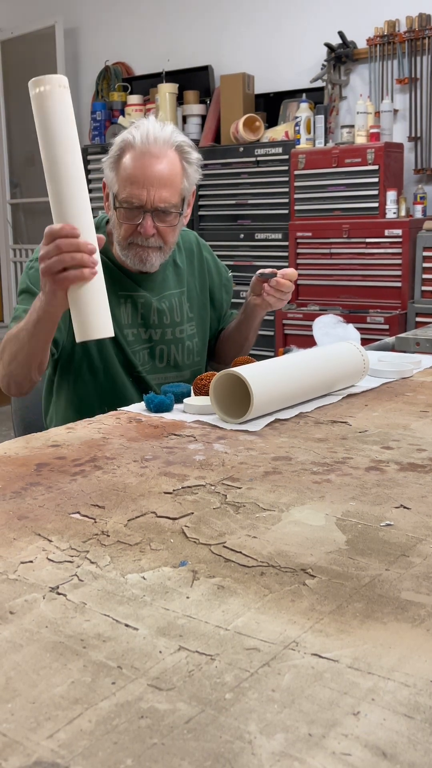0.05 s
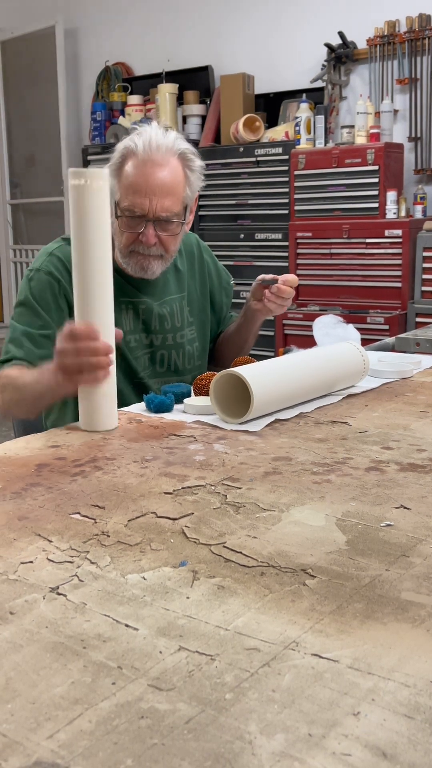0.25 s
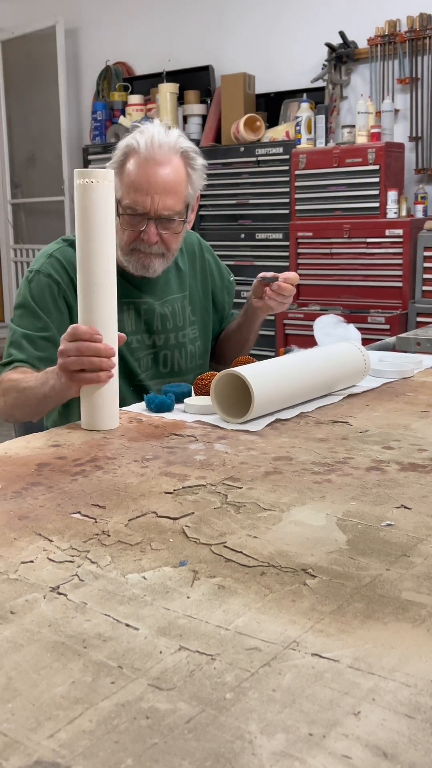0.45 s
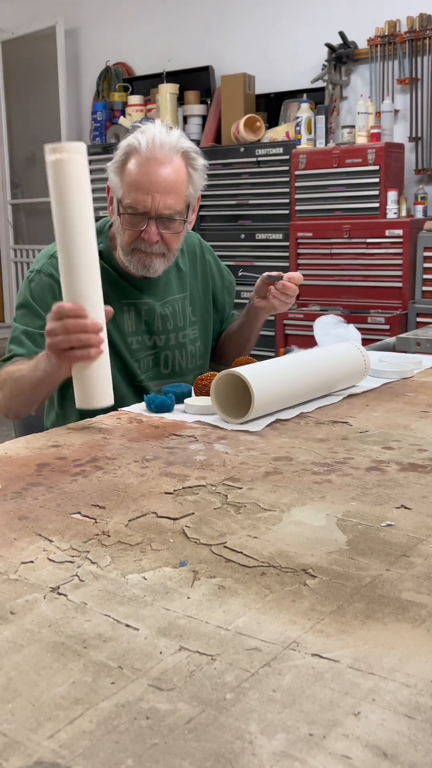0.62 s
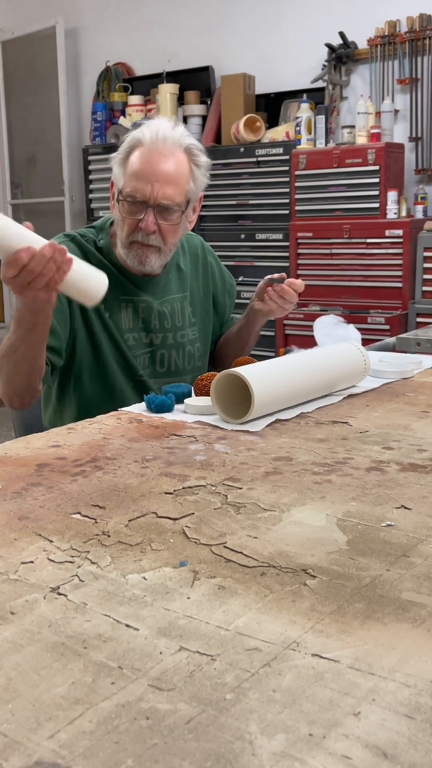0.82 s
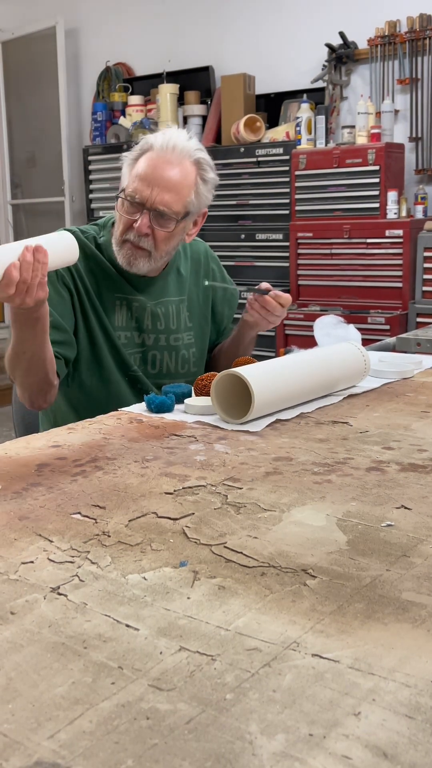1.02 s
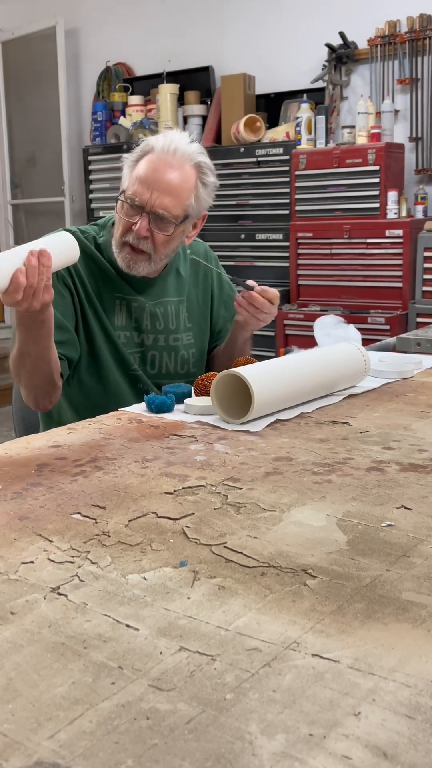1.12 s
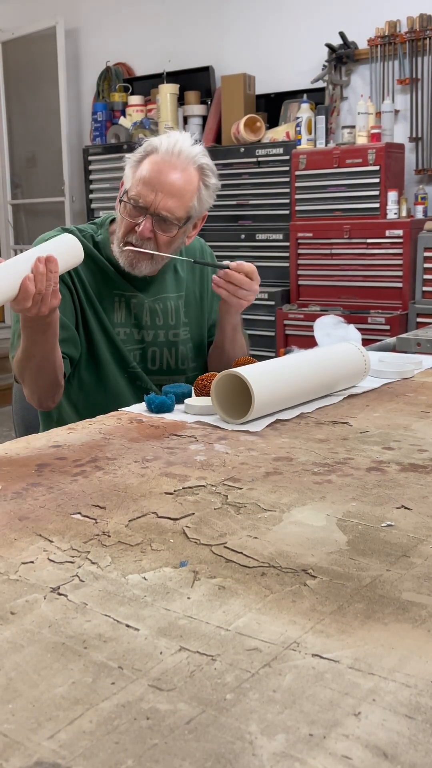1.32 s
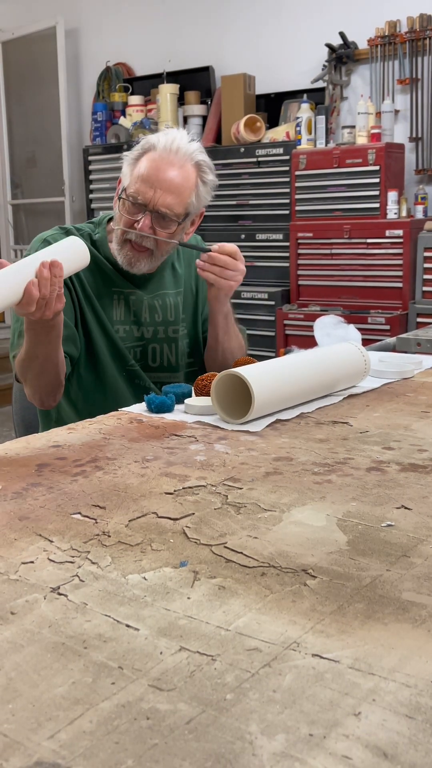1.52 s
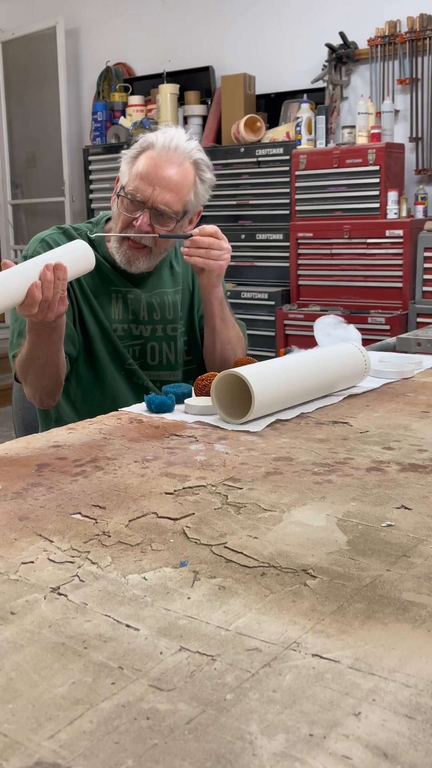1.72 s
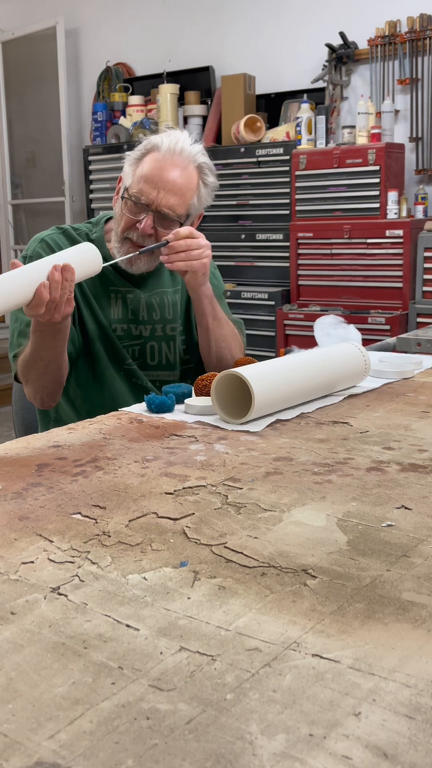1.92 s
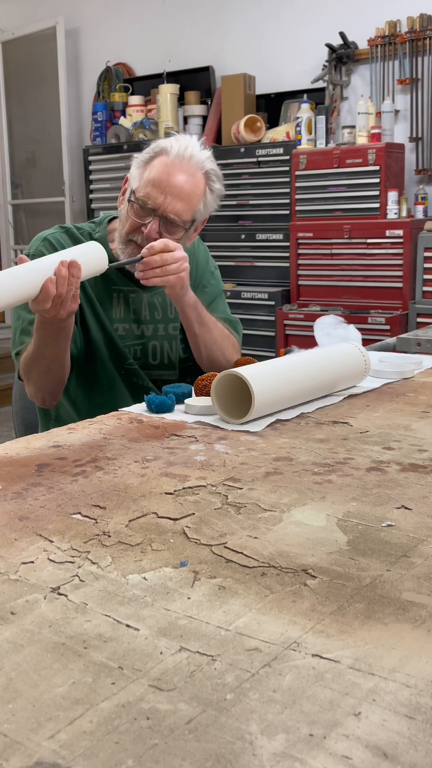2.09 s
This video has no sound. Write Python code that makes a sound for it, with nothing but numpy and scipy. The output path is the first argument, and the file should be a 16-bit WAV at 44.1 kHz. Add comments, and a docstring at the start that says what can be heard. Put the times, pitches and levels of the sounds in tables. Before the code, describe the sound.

Booming knock of a plastic pipe on a wooden bench, followed by light metallic ticks.

```python
"""A live workshop, heard close up from the stereo microphone of a camera standing on a wooden workbench.
An earlier knock is dying away in the room as a plastic pipe is knocked on end on the bench, which booms
and shakes the camera. The limiter ducks under the blow and lets the room swell back.
Lifted off, the open pipe hums faintly, with soft rubs and a tick of handling.
Last, a thin metal rod ticks and taps against its rim."""
import sys
import numpy as np
from scipy import signal
from scipy.fft import rfft, irfft, next_fast_len
from scipy.io import wavfile
from scipy.ndimage import uniform_filter1d, minimum_filter1d, map_coordinates

SR = 44100
rng = np.random.default_rng(int(sys.argv[2]) if len(sys.argv) > 2 else 0)


def wav_out(sig):
    """Save sig, one row per channel (or a flat mono array), as 16-bit PCM at SR to the path in sys.argv[1]."""
    wavfile.write(sys.argv[1], SR, np.round(np.clip(np.atleast_2d(sig).T, -1, 1) * 32767).astype(np.int16))


N = 94815

# Levels are relative within each table; a spectrum's levels are per hertz.
# reverberation of the workshop (frequency [Hz], t60 [s])
ROOM_T60 = [(60, 0.44), (120, 0.61), (300, .8), (600, 0.68), (1500, 0.75), (3000, 0.76), (5500, 0.65),
            (9000, 0.48), (13000, 0.47)]
# left-right likeness at the microphone, room sound and close sound (frequency [Hz], correlation [-1..1])
ROOM_COHERENCE = [(100, 1), (250, .5), (500, -0.023), (1500, .2), (4000, .2), (10000, 0.19)]
CLOSE_COHERENCE = [(100, 0.98), (500, 0.67), (2000, .65), (5000, 1), (10000, 0.48)]
# spectra of the still workshop and of its answer to a knock (frequency [Hz], level [dB])
ROOM_TONE_SPECTRUM = [(20, -22), (45, -10), (75, -2), (120, -2.5), (160, -13), (250, -17), (400, -23),
                      (600, -27.5), (800, -35.5), (1500, -37.5), (3500, -47), (8500, -44), (14000, -57)]
KNOCK_ROOM_SPECTRUM = [(25, -41), (55, -15.5), (85, -7.5), (120, -6), (175, -10.5), (270, -7.5), (360, -5),
                       (570, -0.5), (750, -6), (1050, -8.5), (1800, -11.5), (2900, -15), (4500, -24),
                       (6000, -30.5), (9000, -31.5), (10500, -48), (13000, -68)]
# spectrum of the camera rattling on the bench top (frequency [Hz], level [dB])
RATTLE_SPECTRUM = [(200, -18), (650, -5), (1100, -6), (1650, 3), (2300, -4), (3300, -14), (5000, -38.5),
                   (9000, -54), (13000, -82)]
# rise and fall of that rattle (time [s], level [dB])
RATTLE_ENVELOPE = [(0.22, -59.5), (.228, -21), (0.239, 0.5), (.247, -1.5), (.262, -33), (.29, -59)]
# bench and pipe under the blow (frequency [Hz], level [dB], t60 [s])
BENCH_MODES = [(61, -14.5, 0.71), (114.2, 5, 0.32), (133.8, -5, 0.47), (224.6, 2, 0.13), (337.1, 7.5, 0.13),
               (519.6, -1, 0.14), (550.7, -5, 0.15), (657, 0, 0.17), (820.8, -1, 0.18), (1022, -2, 0.045),
               (1108, -3.5, 0.057), (1249, -0.5, 0.047), (1641, -1, .09)]
# low room resonances that swell and ring on after the knock (frequency [Hz], level [dB], t60 [s])
ROOM_MODES = [(55.4, -28, .6), (117.7, -20, .8), (181, -27, 0.88), (223.3, -23, .8), (343.5, -16, .7),
              (456.6, -18.5, .6), (508, -15, 0.52), (559.3, -13, .6), (590.6, -15, .65), (606, -17, .65),
              (675, -19.5, 0.52)]
# spectra of plastic meeting wood: dull thud and sharp crack (frequency [Hz], level [dB])
THUD_SPECTRUM = [(35, -45), (80, -25), (200, -2.5), (400, 1), (800, -1.5), (1600, -8), (2400, -14),
                 (3600, -14.5), (5200, -29.5), (9000, -33), (11000, -40), (13500, -62)]
CRACK_SPECTRUM = [(500, -6.5), (1500, 5), (4000, 5.5), (6500, -12.5), (9000, -1), (11000, -13.5),
                  (14000, -36)]
# the rim lands, then settles flat (time [s], level [dB])
RIM_CONTACTS = [(.2383, -2.5), (0.2466, -7.5)]
# air column of the open pipe (frequency [Hz], level [dB], t60 [s])
AIR_MODES = [(340.3, -48, 1.9), (676.5, -62, 2.0)]
# soft rubs as the pipe is handled; the one at 1.11 s is the pipe brushing against a shirt (time [s], width [s],
# centre [Hz], width [octaves], level [dB])
HANDLING_RUBS = [(.755, 0.021, 9100, .13, -69), (1.11, 0.033, 880, 0.99, -72), (1.76, 0.058, 2160, 0.63, -79)]
# spectrum of a handling tick (frequency [Hz], level [dB])
TICK_SPECTRUM = [(1200, -22), (2000, -7), (2500, 0), (3000, -4), (3600, -1), (4500, -22)]
# the rod touches the rim (time [s], rod level [dB], wall level [dB], left over right [dB])
ROD_TAPS = [(1.958, -29, -58, 3.5), (2.0543, -33, -52, 2), (2.0625, -22.5, -29.5, 2),
            (2.111, -37.5, -38.5, 5.5), (2.143, -38, -52, 3)]
# spectra of rod and pipe wall at a touch (frequency [Hz], level [dB])
ROD_SPECTRUM = [(250, -24.5), (900, 0), (1400, -7), (1850, -6), (2700, -14), (4200, -19), (5400, -9),
                (6050, 3.5), (7400, -7), (8700, 4.5), (9800, -19), (11000, -9), (12000, -24), (13500, -38)]
WALL_SPECTRUM = [(200, -42), (430, -21), (620, 4.5), (800, -18), (1200, -2), (1500, -2.5), (1820, -0.5),
                 (2200, -7.5), (2700, -10.5), (4500, -10.5), (8000, -33)]
# what rings on in rod and pipe wall (frequency [Hz], level [dB], t60 [s])
ROD_MODES = [(1850, -27, 0.83), (1900, -35, 0.63), (5870, -24, 0.76), (5990, -29, 0.72),
             (6525, -24.5, 0.32), (9300, -32, 0.17), (9100, -28, 0.16), (11400, -37, 0.21)]
WALL_MODES = [(626, -15.5, 0.31), (1280, -22.5, 0.46), (1710, -16.5, 0.31), (2164, -19, .4)]

EARLIER_KNOCK_S, KNOCK_S, LIFT_S, TICK_S = -0.68, 0.2378, 0.73, 1.538
CEILING_DB, RELEASE_DB_PER_S, TOP_HZ = -8, 80.5, 14000
DETECT_S, HOLD_S, SMOOTH_S = 0.0089, 0.19, 0.004
TIME = np.arange(N) / SR


def amp(db):
    """Decibels to amplitude."""
    return 10 ** (np.asarray(db) / 20)


def along(points, hz):
    """Read (frequency, value) points along a log frequency axis."""
    freqs, values = np.transpose(points)
    return np.interp(np.log(hz + 1), np.log(freqs + 1), values)


def pan(db):
    """Channel gains that put the left db above the right."""
    return amp(np.array([[db], [-db]]) / 2)


def at(start_s, x):
    """Move a stereo sound to start_s; whatever falls before zero is cut."""
    shift = round(start_s * SR)
    delay, skip = max(shift, 0), max(-shift, 0)
    return np.pad(x, ((0, 0), (delay, skip)))[:, skip:skip + N]


def filtered(x, response):
    """Shape x by a gain that depends on frequency."""
    size = next_fast_len(N + SR // 2)
    return irfft(rfft(x, size) * response(np.fft.rfftfreq(size, 1 / SR)), size)[..., :N]


def noise(spectrum, coherence):
    """Coloured stereo noise of rms 1, with the given likeness between channels."""
    def mid_side_gains(hz):
        angle = np.arccos(np.clip(along(coherence, hz), -1, 1)) / 2
        return amp(along(spectrum, hz)) * [np.cos(angle), np.sin(angle)]
    mid, side = filtered(rng.standard_normal((2, N)), mid_side_gains)
    pair = np.array([mid + side, mid - side])
    return pair / pair.std()


def fade(t60, attack_s):
    """A rise, and a fall of 60 dB in t60 seconds."""
    return np.exp(-np.log(1000) * TIME / t60) * (1 - np.exp(-TIME / attack_s))


def ring(modes, rise_cycles, blur_hz=0):
    """Damped sines that build over rise_cycles; a wandering phase widens each line by blur_hz."""
    out = 0
    for hz, db, t60 in modes:
        wander = np.cumsum(rng.standard_normal(N)) * np.sqrt(2 * np.pi * blur_hz / SR)
        out += amp(db) * fade(t60, rise_cycles / hz) * np.sin(2 * np.pi * hz * TIME + wander)
    return out


def burst(spectrum, t60):
    """A contact close to the microphone: dense modes that die at once."""
    return noise(spectrum, CLOSE_COHERENCE) * fade(t60, attack_s=0.0003)


def room_tone():
    """The low rumble of the workshop's still air, a little to the left."""
    return amp(-63.5) * noise(ROOM_TONE_SPECTRUM, ROOM_COHERENCE) * pan(db=3)


def reverb(spectrum, build_s=0.018):
    """The workshop answers a contact: reflections build up, and each frequency dies at its own speed."""
    hz, t, bins = signal.stft(noise(spectrum, ROOM_COHERENCE), SR, nperseg=512)
    decay = np.exp(-np.log(1000) * t / along(ROOM_T60, hz)[:, None])
    _, tail = signal.istft(bins * decay, SR, nperseg=512)
    return tail[:, :N] * (1 - np.exp(-TIME / build_s)) * pan(db=1)


def earlier_knock():
    """The tail of an earlier knock still hangs in the room."""
    return at(EARLIER_KNOCK_S, amp(0.5) * reverb(KNOCK_ROOM_SPECTRUM))


def camera_rattle():
    """Shock through the bench top buzzes the right microphone port before the sound arrives by air."""
    times, levels = np.transpose(RATTLE_ENVELOPE)
    envelope = amp(np.interp(TIME, times, levels, left=-np.inf, right=-np.inf))
    return noise(RATTLE_SPECTRUM, CLOSE_COHERENCE) * envelope * amp([[-22], [0]])


def pipe_knock():
    """The rim cracks onto the bench near the microphone; the bench booms and the room answers."""
    bench = amp(-5) * ring(BENCH_MODES, rise_cycles=0.82)
    room_ring = amp(-2) * ring(ROOM_MODES, rise_cycles=2.9)
    boom = -(bench + room_ring) * pan(db=5)  # negative: the bench is pushed down first
    thud = amp(4.5) * burst(THUD_SPECTRUM, t60=0.055)
    cracks = sum(at(s, amp(5.5 + db) * burst(CRACK_SPECTRUM, t60=0.012)) for s, db in RIM_CONTACTS)
    room = amp(-1.5) * reverb(KNOCK_ROOM_SPECTRUM)
    return at(KNOCK_S, boom + thud + room) + cracks


def pipe_hum(waver_db=1.2, wavers_per_s=14):
    """Lifted, the pipe is open at both ends and its air column hums, wavering a little in level."""
    knots = rng.standard_normal(int(N * wavers_per_s / SR) + 4)
    waver = amp(waver_db * map_coordinates(knots, [TIME * wavers_per_s]))
    return at(LIFT_S, ring(AIR_MODES, rise_cycles=44) * waver * pan(db=3))


def handling_rubs():
    """The pipe is handled and brushes a shirt: soft swells of friction noise, each in its own band."""
    out = np.zeros((2, N))
    for peak_s, width_s, hz, octaves, db in HANDLING_RUBS:
        ratio = 2 ** octaves
        band = [(hz / ratio ** 2, -30), (hz / ratio, -4), (hz, 0),
                (hz * ratio, -4), (hz * ratio ** 2, -40)]
        swell = np.exp(-0.5 * ((TIME - peak_s) / width_s) ** 2)
        out += amp(db) * noise(band, ROOM_COHERENCE) * swell
    return out


def handling_tick():
    """One faint, close tick from the handled pipe, with a trace of room."""
    return at(TICK_S, amp(-65) * burst(TICK_SPECTRUM, t60=0.023) + amp(-80) * reverb(TICK_SPECTRUM))


def rod_taps():
    """Each touch, just left of centre, rings the bright rod and duller pipe wall; the room answers."""
    out = np.zeros((2, N))
    for start_s, rod_db, wall_db, pan_db in ROD_TAPS:
        close_rod = burst(ROD_SPECTRUM, t60=0.018) + ring(ROD_MODES, rise_cycles=4.1, blur_hz=25)
        rod = close_rod * pan(pan_db) + amp(-18.5) * reverb(ROD_SPECTRUM)
        close_wall = burst(WALL_SPECTRUM, t60=0.028) + ring(WALL_MODES, rise_cycles=3, blur_hz=25)
        wall = close_wall * pan(pan_db) + amp(-13.5) * reverb(WALL_SPECTRUM)
        out += at(start_s, amp(rod_db) * rod + amp(wall_db) * wall)
    return out


def scene():
    """All that reaches the microphone on the bench."""
    return (room_tone() + earlier_knock() + camera_rattle() + pipe_knock()
            + pipe_hum() + handling_rubs() + handling_tick() + rod_taps())


def record(dry):
    """The camera's limiter ducks, holds and recovers steadily; peaks are rounded and the top is cut."""
    power = np.abs(uniform_filter1d(np.mean(dry ** 2, axis=0), int(DETECT_S * SR)))
    needed_db = np.minimum(CEILING_DB - 10 * np.log10(power + 1e-12), 0)
    half_hold = int(HOLD_S * SR / 2)
    held_db = minimum_filter1d(needed_db, 2 * half_hold + 1, origin=half_hold)
    climb_db = RELEASE_DB_PER_S * TIME
    released_db = np.minimum.accumulate(held_db - climb_db) + climb_db  # caps how fast the gain rises
    limited = dry * amp(uniform_filter1d(released_db, int(SMOOTH_S * SR)))
    rounded = limited / (1 + np.abs(limited) ** 6) ** (1 / 6)
    return filtered(rounded, lambda hz: 1 / (1 + (hz / TOP_HZ) ** 80))


dry = scene()
out = record(dry)
wav_out(out)
```